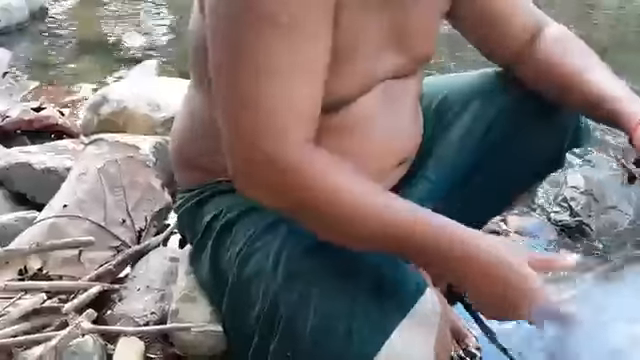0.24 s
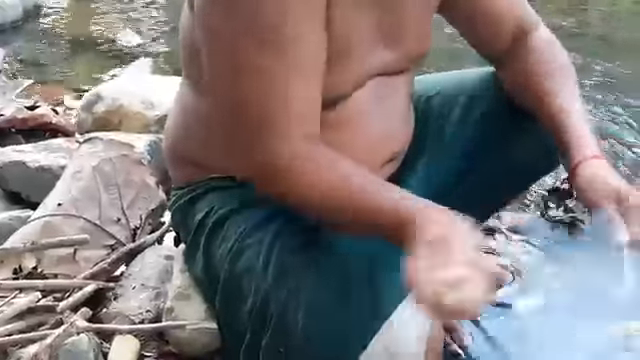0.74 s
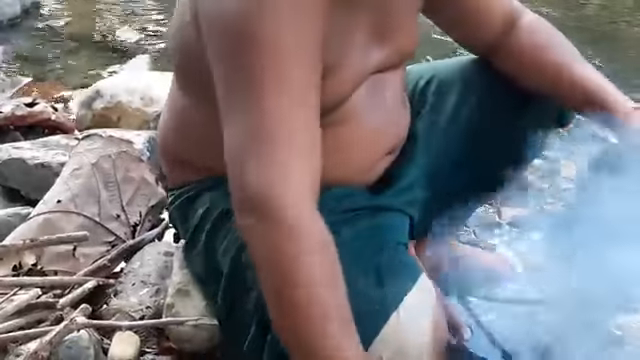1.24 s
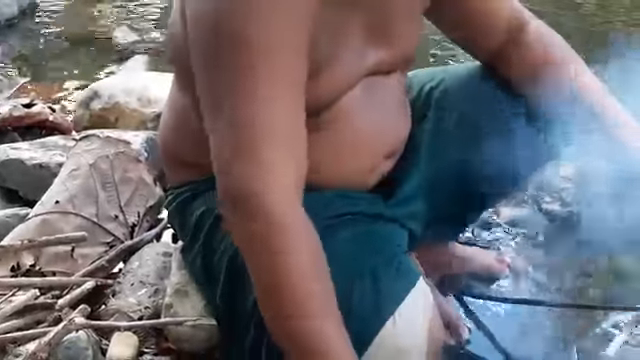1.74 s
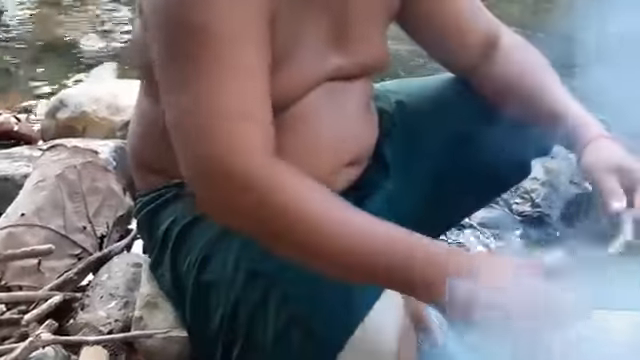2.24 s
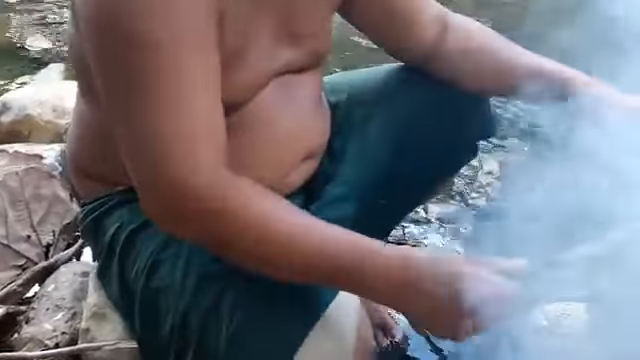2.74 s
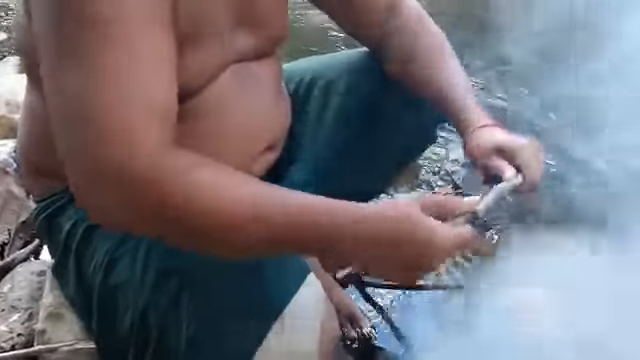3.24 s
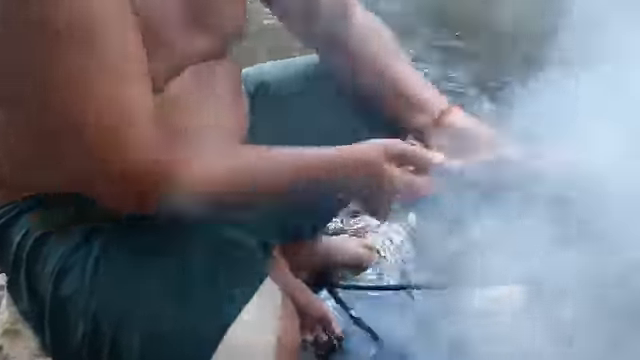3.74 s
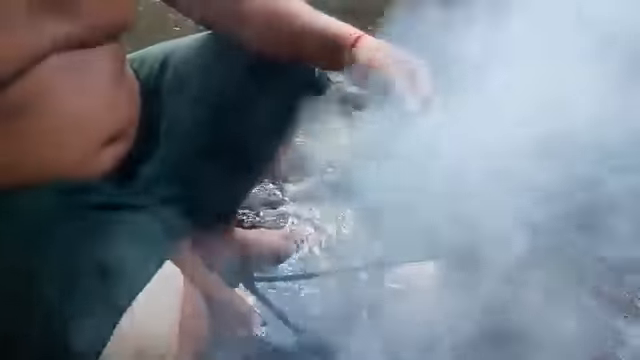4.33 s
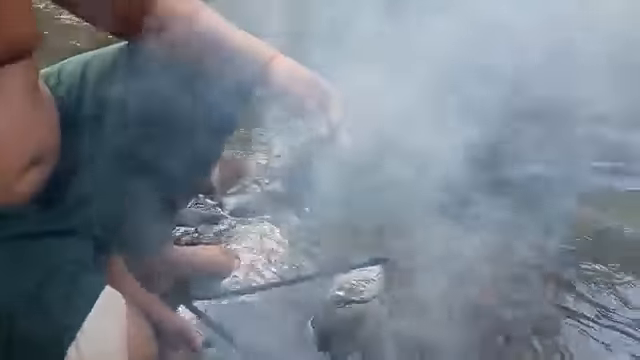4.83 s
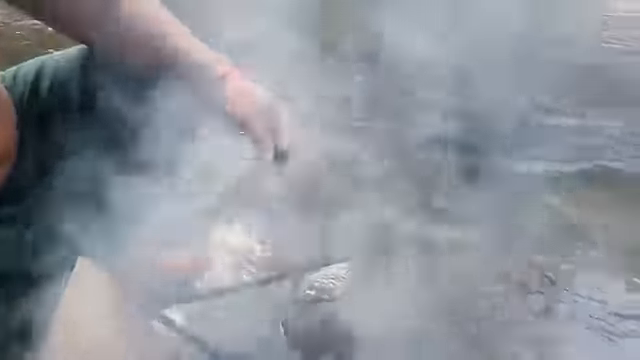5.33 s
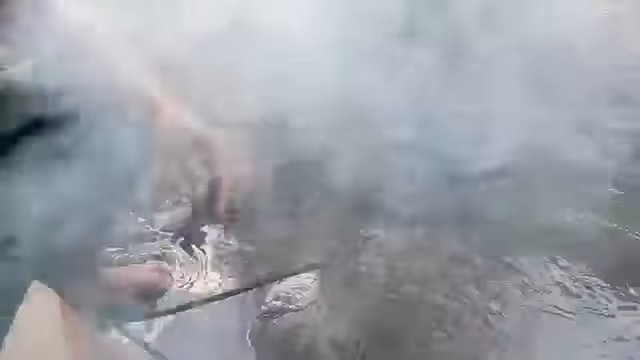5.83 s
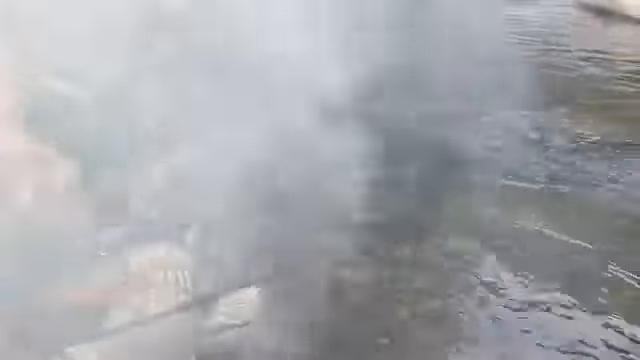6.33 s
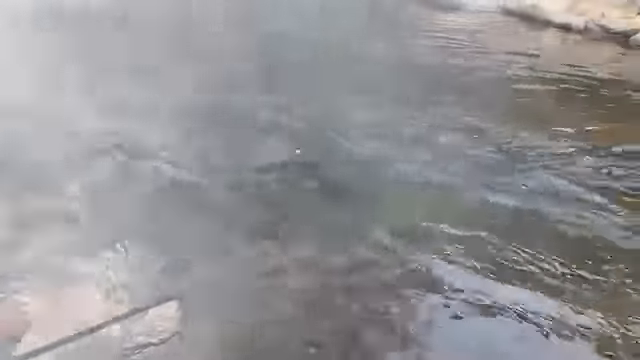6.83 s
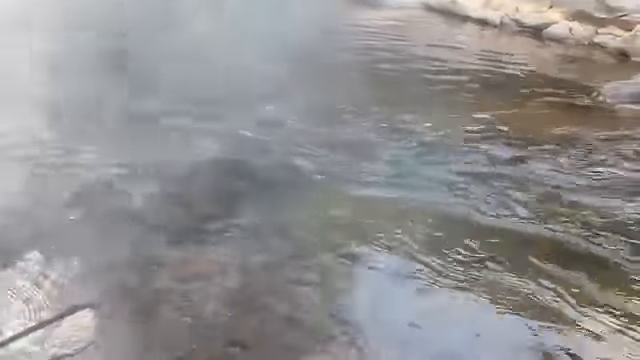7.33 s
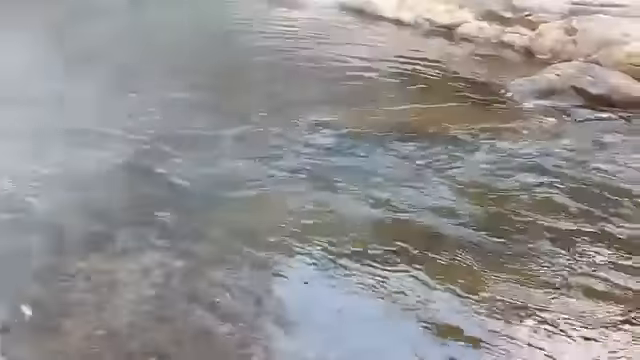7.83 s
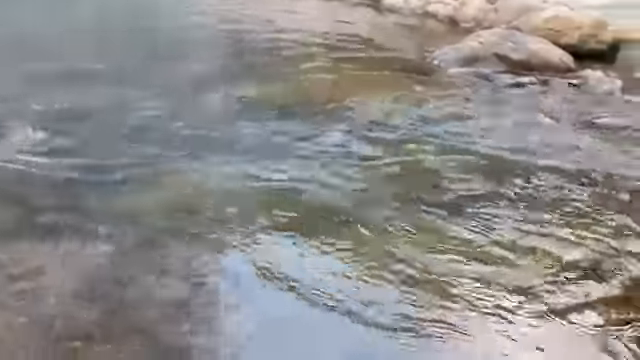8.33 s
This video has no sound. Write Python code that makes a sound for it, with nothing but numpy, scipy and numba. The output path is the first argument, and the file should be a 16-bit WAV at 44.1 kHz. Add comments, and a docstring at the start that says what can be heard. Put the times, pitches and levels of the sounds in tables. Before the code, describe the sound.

A shallow river runs over stones outdoors, heard through a stereo phone on the bank, the nearest riffle lying to the right. From 0 to 0.6 seconds the water is subdued, then it quickly opens into a steady, flickering broadband rush with some low body, fine trickling and hollow gurgles around low pitches. Individual bubbles plop and ring through 1 to 3.5 seconds. At 3.6 seconds a dry twig snaps close by: extremely sharp, bright and loud, followed by a ragged echo off the rocks fading within about a quarter second. The river drops markedly after it, with a faint rustle near 4.0, and returns at about 4.7 to 4.9 seconds. From 5 seconds the gurgling is fuller, with rounder plops, busiest around 8. Near 7.75 a faint smear of noise leads into a small, dry tick, slightly left. The water continues to the end at about 8.6 seconds.

```python
"""A shallow river rushes over stones to the right of a phone on the bank, gurgling in the hollows.
A dry twig snaps close by and echoes off the rocks; a rustle follows, then a faint smear of noise and a small tick.
The water is flickering bands of noise plus ringing bubbles; the wood is noise bursts through resonances.
The gain of the river is low at the start and after the snap, at set times, and recovers; a limiter holds
the snap down."""
import sys
import numpy as np
from scipy import signal
from scipy.fft import rfft, irfft, next_fast_len
from scipy.io import wavfile
from scipy.ndimage import uniform_filter1d, minimum_filter1d, map_coordinates
from numba import njit

SR = 44100
rng = np.random.default_rng(int(sys.argv[2]) if len(sys.argv) > 2 else 0)


def generate_wav(sig):
    """Save sig (samples, or channels by samples) to the path in sys.argv[1] as 16-bit PCM at SR."""
    pcm = np.round(np.clip(np.atleast_2d(sig).T, -1, 1) * 32767).astype(np.int16)
    wavfile.write(sys.argv[1], SR, pcm)


N = 379260
T = np.arange(N) / SR


def undb(db):
    """Decibels to gain."""
    return 10 ** (np.asarray(db) / 20)


def level(x, db):
    """Scale to an rms level."""
    return x * undb(db) / np.sqrt(np.mean(x ** 2))


def over_hz(table, hz):
    """Read a (f/Hz, value) table on a log-frequency axis."""
    at, value = np.transpose(table)
    return np.interp(np.log(hz + 1), np.log(at), value)


def coloured(x, gain):
    """Weight the spectrum of x by gain(Hz)."""
    n = x.shape[-1]
    return irfft(rfft(x) * gain(np.fft.rfftfreq(n, 1 / SR)), n)


def bell(f, centre_hz, width):
    """Gain of a broad band-pass; width is a share of the centre."""
    return 1 / (1 + ((f / centre_hz - centre_hz / (f + 1)) / width) ** 2)


def walk(rate):
    """Random levels held 1 / rate s and slewed twice; spread 1."""
    k = int(SR / rate)
    steps = np.repeat(rng.standard_normal(N // 60), k)[:N]
    slewed = uniform_filter1d(uniform_filter1d(steps, k), k)
    return slewed / slewed.std()


def from_riffle(x):
    """One source heard at both ports, later on the left, so it lies to the right."""
    # as the phone turns: t/s, delay of the left port/ms
    left_lag = [(0, 0.33), (.8, 0.48), (3.2, 0.5), (4.1, 0.48), (4.8, 0.46), (5.4, 0.46), (6.6, 0.45),
                (7.5, 0.43), (8.6, 0.31)]
    lag = np.interp(T, *np.transpose(left_lag)) * SR / 1000
    left = map_coordinates(x, [np.arange(N) - lag], order=3, mode="nearest")
    return np.array([left, x])


@njit
def add(out, start, hz, cycles, size, glide):
    """Add ringing grains whose pitch glides up while they fade by 50 dB."""
    for g in range(len(start)):
        n = int(cycles[g] * SR / hz[g])
        phase = 0.
        for i in range(min(n, len(out) - start[g])):
            age = i / n
            phase += 2 * np.pi * hz[g] * (1 + glide * age) / SR
            attack = min(8. * age, 1.)
            out[start[g] + i] += size[g] * np.sin(phase) * attack * np.exp(-5.8 * age)


def rush(bass_db, middle_db, middle_hz=1510, flicker_db=1.43, waver_db=-0.2, flutter_db=0.23):
    """Countless tiny bursts blur to noise; bands flicker alone and waver slightly together; the treble flutters."""
    # colour of the rush: f/Hz, relative level per Hz/dB
    colour = [(30, -11), (80, -11), (150, -1.5), (210, -5.5), (430, -5.5), (850, -5), (1300, -4),
              (2200, -7), (5000, -7.5), (5800, -11), (7200, -5.5), (7700, -14), (10000, -18),
              (15000, -22.5)]
    # straight from the nearest riffle, the rest from all round: f/Hz, share of power (0-1)
    straight = [(40, 0.95), (150, 1), (300, 0.93), (500, 0.47), (850, 0.39), (1050, 0.68), (1200, 0.79),
                (1600, 0.68), (2300, 0.48), (3000, 0.34), (8000, 0.02)]
    size = next_fast_len(N)
    hz = np.fft.rfftfreq(size, 1 / SR)
    share = np.clip(over_hz(straight, hz), 0, 1)
    weights = np.sqrt([share, 1 - share, 1 - share]) * undb(over_hz(colour, hz))
    spectra = rfft(rng.standard_normal((3, size))) * weights
    out, waver, flutter = 0, walk(13), walk(22)
    for step in np.arange(-11, 9):  # half octaves from 1 kHz
        distance = 2 * np.log2((hz + 1) / 1000) - step
        mask = np.cos(np.pi / 2 * np.clip(distance, -1, 1)) ** 2
        bass_share = np.clip(-step / 4 + 0.98, 0, 1)
        middle_share = max(1 - abs(step / 2 - np.log2(middle_hz / 1000.)), 0)
        treble_share = np.clip(step / 6, 0, 1)
        flicker = walk(14 + 2 * max(step, 0))  # faster higher up
        db = waver_db * waver + flicker_db * flicker + flutter_db * treble_share * flutter
        db = db + bass_share * bass_db + middle_share * middle_db
        out = out + irfft(spectra * mask, size)[:, :N] * undb(db)
    return level(from_riffle(out[0]) + out[1:], 0)


def gain_dips(sink_s=0.33, settle_s=0.31, recovery_curve=2.1):
    """Gain that sinks towards a depth, recovers ever faster part of the way and settles the rest slowly; in dB."""
    # set dips of the river's gain: start t/s, length/s, depth/dB, recovery time/s, share left to settle (0-1)
    dips = [(-.4, 1.002, 16, 0.18, 0.16), (-.4, 1.53, 7, 0.048, 0.94), (3.646, 1.036, 18.5, 0.2, 0.6)]
    out = 0
    for s, length, depth_db, recovery_s, share in dips:
        sunk = 1 - np.exp(-np.clip(T - s, 0, length) / sink_s)
        since = np.maximum(T - s - length, 0)
        recovery = np.maximum(1 - (since / recovery_s) ** recovery_curve, 0)
        left = (1 - share) * recovery + share * np.exp(-since / settle_s)
        out = out - depth_db * sunk * left
    return out


def gurgle(hollows, count, pitch=np.ones(N), spread_db=3.5, ring_s=0.07, shorter=0.34, ring_spread=0.45,
           glide=0.05):
    """Many bubbles of random size ring at the pitches of the hollows between the stones; high ones die sooner."""
    when, which = rng.random((count, 2)).T
    off, loud, long = rng.standard_normal((count, 3)).T
    hz, width, db = np.array(hollows)[(which * len(hollows)).astype(int)].T
    out = np.zeros(N)
    start = (when * N).astype(int)
    cycles = ring_s * np.exp(ring_spread * long) * hz * (hz / 300) ** -shorter
    bubble_hz = (hz + width / 2 * off) * pitch[start]
    size = undb(db + spread_db * np.clip(loud, -2, 1.5))
    add(out, start, bubble_hz, cycles, size, glide)
    return level(out, 0)


def plops(glide=0.059, mates_db=-11, mates_s=0.013, mates_spread=0.14):
    """The few large bubbles that stand out, each with three weaker mates close in time and pitch."""
    # loud single bubbles: t/s, peak level/dB, starting pitch f/Hz, ring/cycles
    singles = [(0.954, -38, 300, 11), (1.319, -31, 306, 20), (1.64, -29, 2550, 20), (1.691, -33, 640, 15),
               (1.747, -33.5, 260, 10), (1.79, -30.5, 596, 10), (2.057, -25, 277, 7.8),
               (2.429, -35, 285, 6.5), (2.686, -41, 463, 12), (2.865, -28, 1950, 12),
               (3.033, -21.5, 1160, 16), (3.055, -32, 270, 7.9), (3.191, -31, 600, 17),
               (3.227, -34, 2230, 12), (3.494, -26, 1800, 13), (3.683, -32, 322, 9), (4.45, -43, 1450, 30),
               (4.825, -41, 284, 22), (4.855, -36, 610, 16), (4.965, -42, 289, 6.8),
               (5.073, -39.5, 305, 22), (5.08, -24, 890, 20), (5.114, -28.5, 1720, 44),
               (5.382, -32, 326, 8.4), (5.396, -28, 568, 19), (5.497, -30.5, 284, 15),
               (5.591, -29.5, 533, 23), (6.016, -33, 288, 8.7), (6.152, -33, 314, 9.8),
               (6.28, -41, 280, 10), (6.466, -32, 2040, 14), (6.563, -35, 570, 22), (6.932, -34, 570, 14),
               (6.98, -31, 260, 8.6), (7.026, -24, 840, 16), (7.312, -31, 482, 9.3), (7.513, -29, 244, 10),
               (7.533, -28.5, 566, 11), (7.724, -31, 269, 9.6), (7.844, -30, 549, 37),
               (7.934, -29.5, 292, 8.2), (7.962, -30, 657, 10), (8.01, -26.5, 254, 9.3),
               (8.011, -27, 530, 11), (8.11, -31.5, 240, 5.7), (8.115, -20, 790, 16), (8.19, -29, 790, 10),
               (8.224, -32.5, 225, 14), (8.257, -32, 565, 6.6), (8.36, -32, 333, 6.5),
               (8.501, -32, 250, 6.3), (8.558, -35, 231, 7.1), (8.579, -36, 904, 13)]
    s, db, hz, cycles = np.transpose(singles)
    out = np.zeros(N)
    # the grain's envelope peaks near one half, hence the factor 2
    add(out, (s * SR).astype(int), hz, cycles, 2 * undb(db), glide)
    for late, off in rng.standard_normal((len(s), 3, 2)).transpose(1, 2, 0):
        start = ((s + mates_s * late) * SR).astype(int)
        add(out, start, hz * np.exp(mates_spread * off), cycles, 2 * undb(db + mates_db), glide)
    return out


def snaps(edge_db=-22, thump_s=0.0017, knock_s=0.00086, tear_rise_s=0.00031):
    """A tearing of fibres rings the twig, with a knock and a push of air; the rocks return a longer, ragged wash."""
    # the snap and the small tick: t/s, nominal peak level ahead of the limiter/dB, centre f/Hz,
    # width (share of centre), tearing time/s, thump above snap/dB, echo before its fades above snap/dB,
    # left minus right/dB, share of plain crack against the ring of the twig (0-1), knock f/Hz,
    # knock above snap/dB
    breaks = [(3.6013, 13.5, 4770, 0.73, 0.0041, -20.5, -20.5, 0, 0.1, 1500, -17),
              (7.7537, -11.5, 6200, 0.81, 0.003, -31, -27, 4.5, 0.9, 2450, -12)]
    # resonances of the twig: f/Hz, width/Hz, relative level/dB
    resonances = [(2880, 200, 0), (3620, 250, -1), (4200, 230, -11), (4770, 330, -6), (5530, 270, 0.5),
                  (6770, 470, 2)]
    # colour of the rocks' echo: f/Hz, relative level per Hz/dB
    echo_colour = [(600, -41), (2000, -15), (2800, -3), (3400, 1.5), (4000, 6.5), (4500, 0.5), (5200, 4.5),
                   (5900, -3.5), (6700, 4.5), (7800, -11.5), (9300, -2.5), (12000, -7.5), (15000, -14)]
    echo_t60_s, echo_rise_s = 0.22, 0.018
    treble_hz, treble_t60_s = 7500, 0.2
    ragged_db, crackle_db = .7, 1.6
    out = np.zeros((2, N))
    t = T[:SR // 2]

    def twig(f):
        """Sum of the twig's resonances."""
        return sum(undb(db) / (1 + (2 * (f - hz) / width) ** 2) for hz, width, db in resonances)

    for s, db, hz, width, tear_s, thump_db, echo_db, pan_db, plain, knock_hz, knock_db in breaks:
        tear, wash = rng.standard_normal((2, 2, len(t)))
        tear = coloured(tear, lambda f: ((1 - plain) * twig(f) + plain) * bell(f, hz, width) + undb(edge_db))
        tear = level(tear, db - 6.5)  # rms below peak
        tear = tear * np.minimum(t / tear_rise_s, 1) * np.exp(-t / tear_s)
        knock = undb(db + knock_db) * np.sin(2 * np.pi * knock_hz * t) * np.exp(-t / knock_s)
        thump = undb(db + thump_db) * np.exp(1 - t / thump_s) * t / thump_s
        wash = level(coloured(wash, lambda f: undb(over_hz(echo_colour, f))), db + echo_db)
        treble = coloured(wash, lambda f: f > treble_hz)
        wash = (wash - treble) * undb(-60 * t / echo_t60_s) + treble * undb(-60 * t / treble_t60_s)
        wash = wash * (1 - np.exp(-(t / echo_rise_s) ** 3))
        wash = wash * undb(ragged_db * walk(133)[:len(t)] + crackle_db * walk(900)[:len(t)])
        i = int(s * SR)
        out[:, i:i + len(t)] += (tear + knock + thump + wash) * undb([[pan_db / 2], [-pan_db / 2]])
    return out


def rustle_and_smear(width=0.73, grain_s=.0015):
    """Noise made grainy by sparse random peaks swells and fades: a rustle, then a faint smear before the tick."""
    # the rustle and the smear: t/s, level at the height of the swell/dB, centre f/Hz, length/s
    swells = [(3.96, -42.5, 5540, 0.046), (7.742, -38, 7000, 0.0084)]
    out = 0
    for s, db, hz, length in swells:
        peaks = rng.standard_normal(N) ** 8
        grains = np.abs(uniform_filter1d(peaks, int(grain_s * SR))) ** .5
        noise = coloured(rng.standard_normal((2, N)) * grains, lambda f: bell(f, hz, width))
        swell = np.exp(-((T - s - length / 2) / (length / 2)) ** 2)
        out = out + level(noise, db) * swell
    return out


def spatter(count, hz=4600.0, cycles=9.1, glide=0., spread_db=3.):
    """Drops and small bubbles all round ring at pitches scattered over three octaves."""
    out = np.zeros((2, N))
    for port in out:
        when, pitch = rng.random((count, 2)).T
        size = undb(spread_db * rng.standard_normal(count))
        drop_hz = hz * 2 ** (3 * pitch - 1.5)
        add(port, (when * N).astype(int), drop_hz, np.full(count, cycles), size, glide)
    return level(out, 0)


def scene():
    """River, bubbles and dry wood at the two ports."""
    # the water as the phone turns: t/s, level change of rush and spatter/dB, bass lift before levelling/dB,
    # middle lift (rush before levelling, and fizz)/dB, gurgle level/dB, gurgle pitch (share of the hollows')
    balance = [(0, -2.5, -0.5, 5.5, -42, 0.99), (.66, -0.5, 7, -4, -43.5, 1.04),
               (.85, -1.1, 3, -2, -44, 0.85), (1.5, -0.5, 3.5, -1.5, -43.5, 1.095),
               (2.198, -0.46, 2.5, -0.5, -42.5, 1.005), (3.3, -0.5, 2.5, -1, -46, 1.07),
               (3.75, -1, 2.5, -3, -45.5, 1.01), (4.1, -2.4, 2.5, -1.5, -49, 1.01),
               (4.6, -1, 1, -1, -42.5, 1.05), (4.9, 0.6, 0.7, -1.5, -44.5, 1.05),
               (5.6, 0, 0, 0, -39.5, 1.02), (6.801, -0.2, 1.6, -1.8, -40, 0.98),
               (7.5, 0.16, 1.5, -2.7, -40.5, 0.95), (8.6, -1.1, 2.5, 1, -42, 0.93)]
    # where bubbles ring: f/Hz, spread/Hz, relative level/dB
    hollow_tones = [(272.2, 45, -5), (320.4, 26.5, -6.5), (460.5, 73, -17), (576.6, 49, -7.5),
                    (693, 82, -21.5), (846, 50, -3.5)]
    s, *columns = np.transpose(balance)
    change_db, bass_db, middle_db, gurgle_db, pitch = (np.interp(T, s, column) for column in columns)
    dip = undb(gain_dips())
    # levels in dB before gain dips and balance
    water = undb(-33.5) * rush(bass_db, middle_db)
    water = water + undb(-60.5) * spatter(count=6000)
    trickle = spatter(count=3000, hz=3578.0, cycles=35.0, glide=0.18)
    water = (water + undb(-46) * trickle) * dip * undb(change_db)
    gurgling = undb(gurgle_db) * gurgle(hollow_tones, count=2200, pitch=pitch)
    # a hollow that gurgles only at first: f/Hz, spread/Hz, relative level/dB
    early = undb(-43.5) * gurgle([(475, 84, 0)], count=600) * np.exp(-(T / 0.71) ** 4)
    # dense small bubbles at the riffle, same columns
    fizz = undb(-49 + middle_db) * gurgle([(1851, 800, 0)], count=6000, ring_s=0.047)
    bubbles = dip * (gurgling + early + fizz) + plops()
    return water + from_riffle(bubbles) + snaps() + rustle_and_smear()


def record(dry):
    """The ports differ in colour and lose the deep bass; a look-ahead limiter ducks under peaks; the top is cut."""
    # colour difference of the ports: f/Hz, left minus right/dB
    port_colour = [(300, 0), (1000, 0), (5000, -.5), (6100, 1), (8500, -3), (13000, -2)]
    bass_cut_hz, top_hz = 132, 15050
    limit_db, ceiling, sense_s = -4.5, .9, .001
    look_ahead_s, release_db_per_s = .004, 900
    x = coloured(dry, lambda f: undb(np.outer([.5, -.5], over_hz(port_colour, f))))
    x = signal.sosfilt(signal.butter(2, bass_cut_hz, "high", fs=SR, output="sos"), x)
    power = uniform_filter1d((x ** 2).max(axis=0), int(sense_s * SR))
    over_db = np.maximum(10 * np.log10(np.abs(power) + 1e-12) - limit_db, 0)
    ahead = int(look_ahead_s * SR)
    early_db = -minimum_filter1d(-over_db, 2 * ahead, origin=-ahead // 2)
    # the cut is let go at a steady rate
    release_db = release_db_per_s * T
    cut_db = np.maximum.accumulate(early_db + release_db) - release_db
    x = x * undb(-uniform_filter1d(cut_db, ahead // 2))
    x = ceiling * np.tanh(x / ceiling)  # what slips past is rounded off
    return signal.sosfilt(signal.ellip(10, .2, 80, top_hz, fs=SR, output="sos"), x)


dry = scene()
out = record(dry)
generate_wav(out)
```